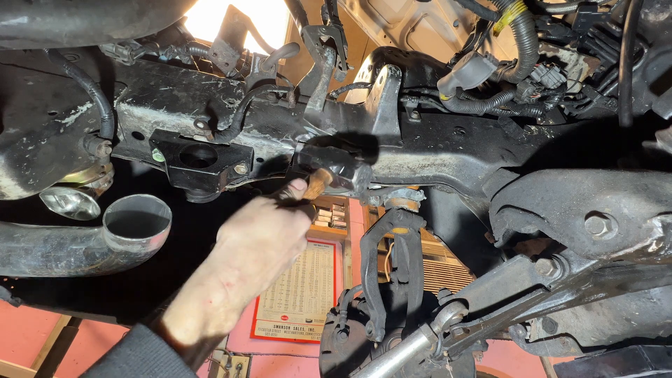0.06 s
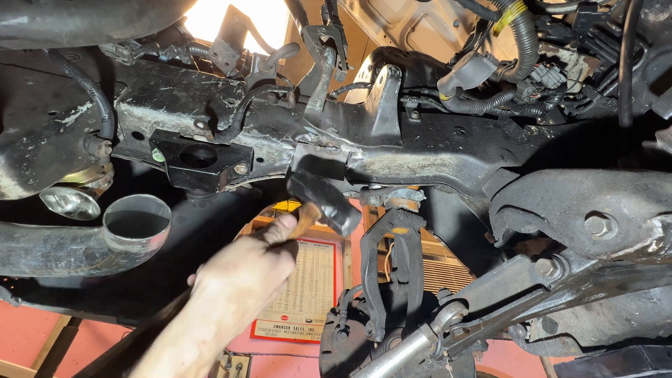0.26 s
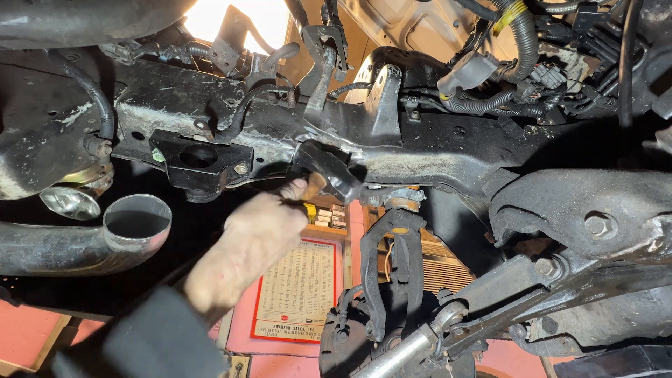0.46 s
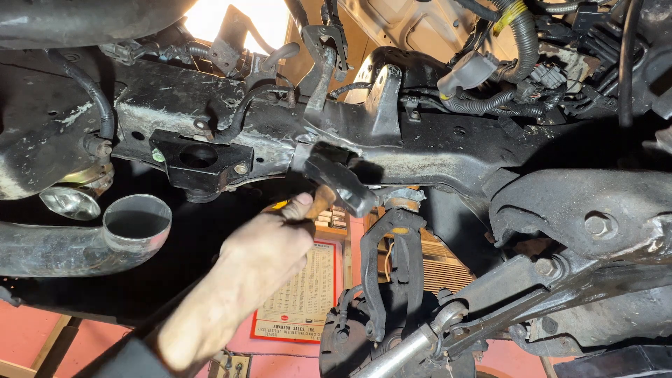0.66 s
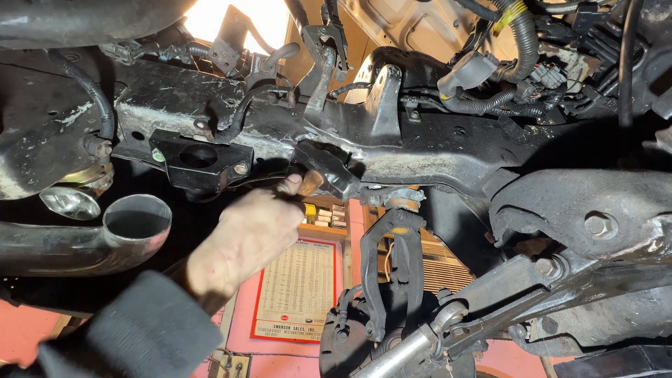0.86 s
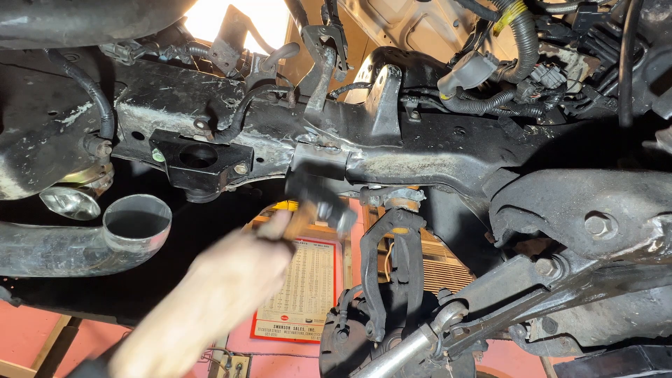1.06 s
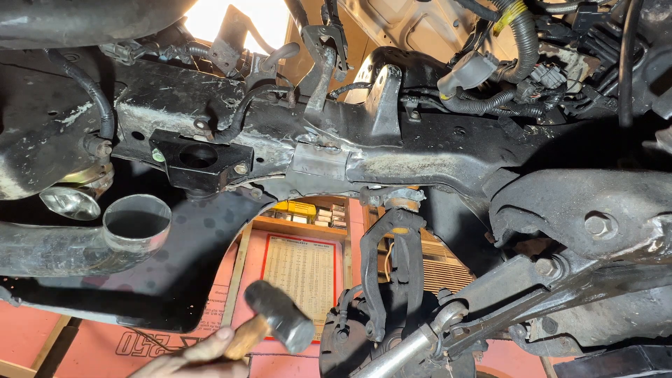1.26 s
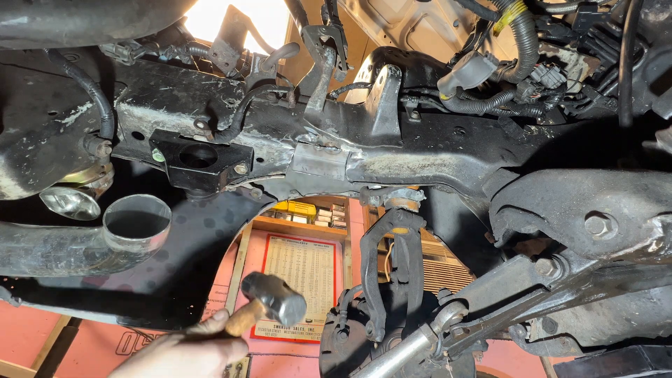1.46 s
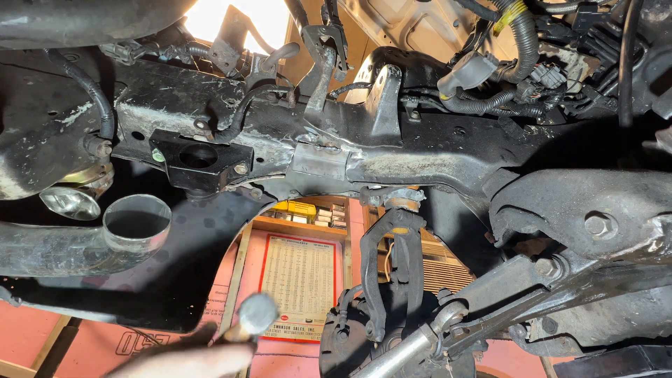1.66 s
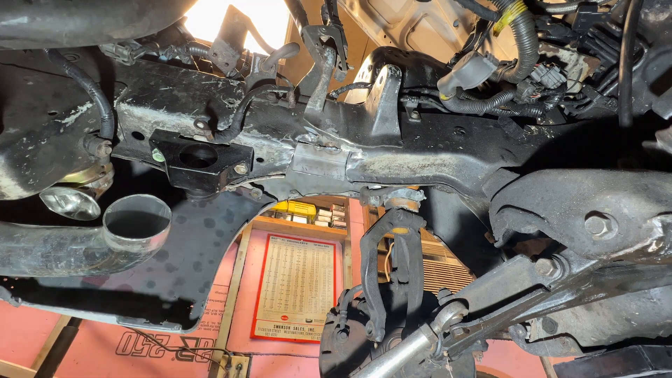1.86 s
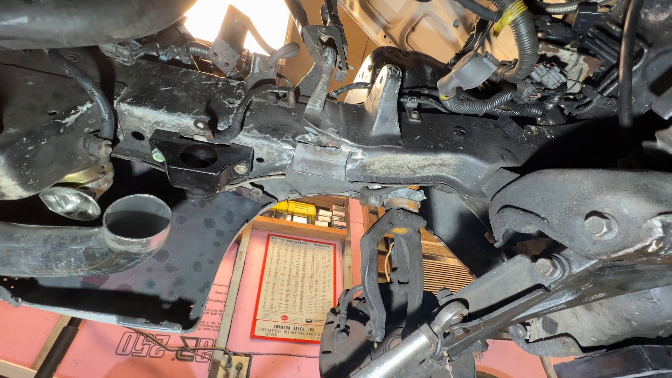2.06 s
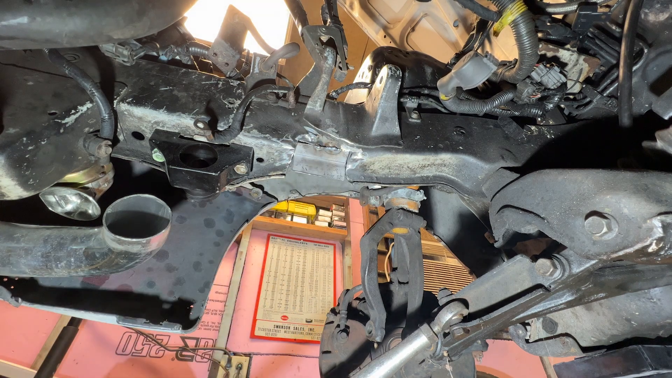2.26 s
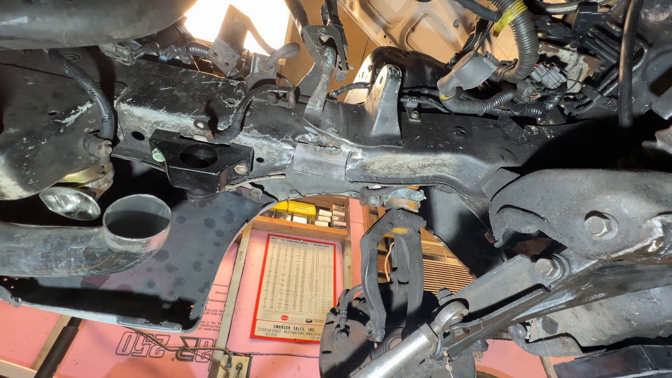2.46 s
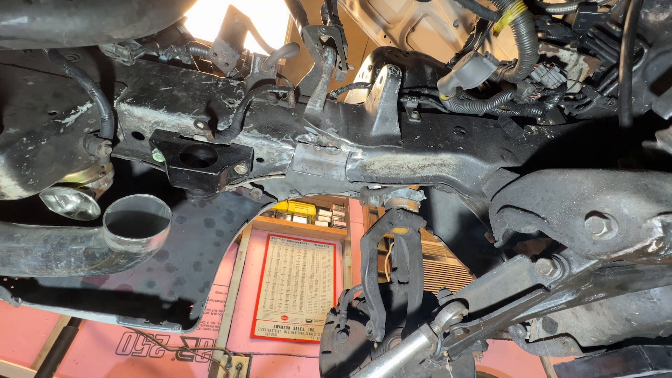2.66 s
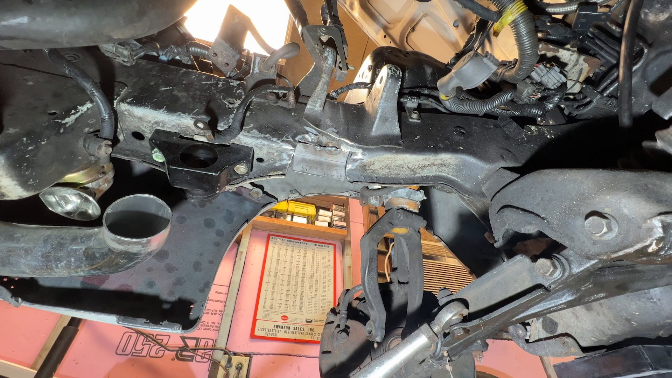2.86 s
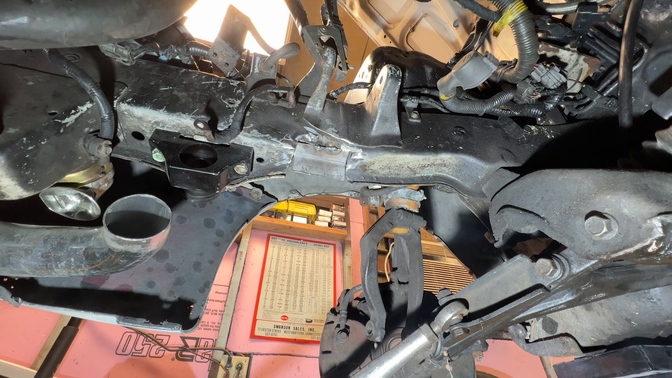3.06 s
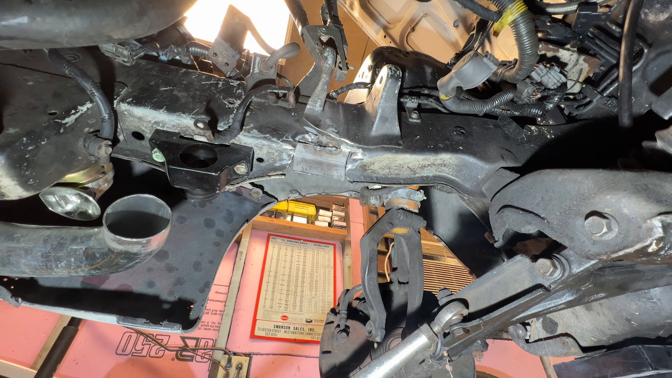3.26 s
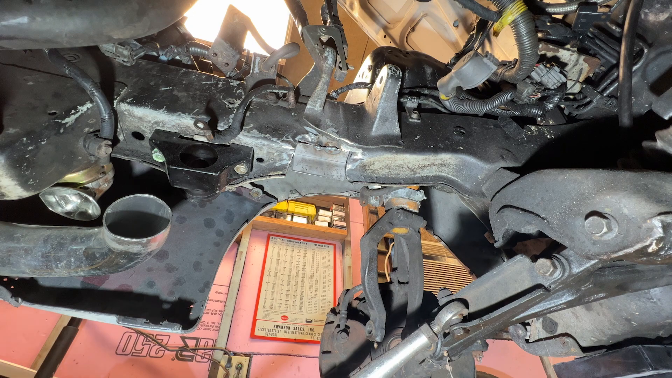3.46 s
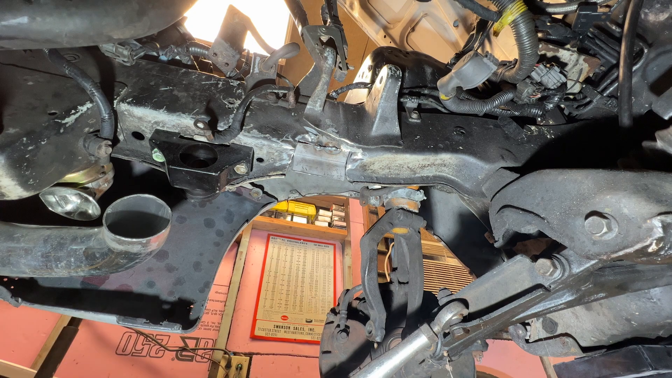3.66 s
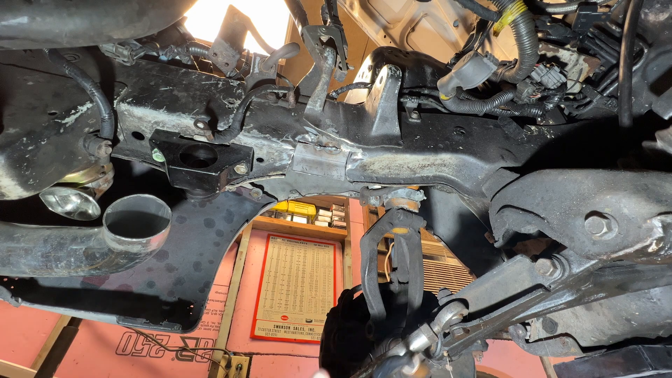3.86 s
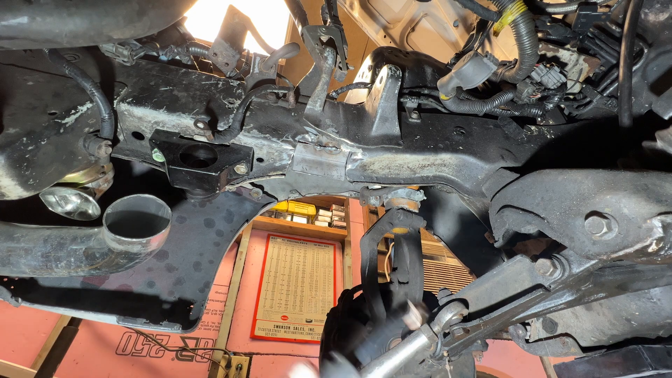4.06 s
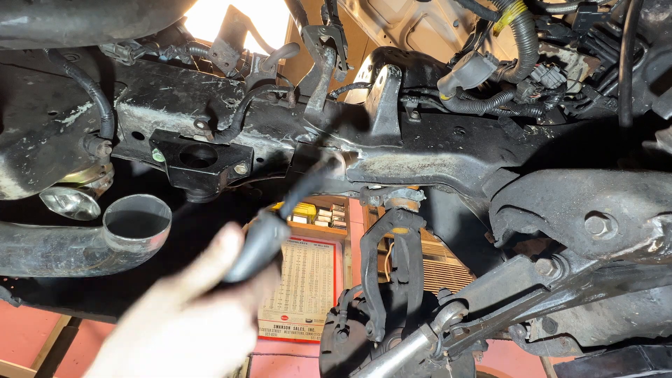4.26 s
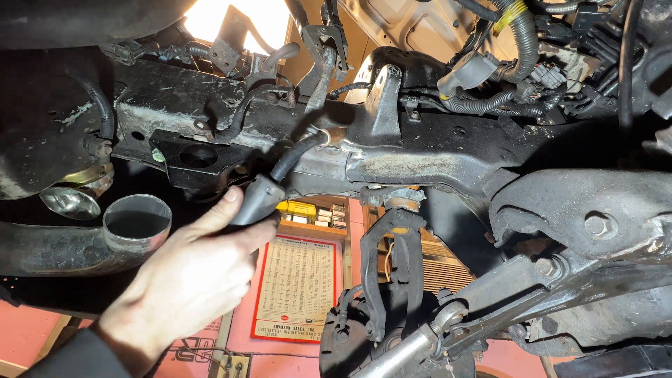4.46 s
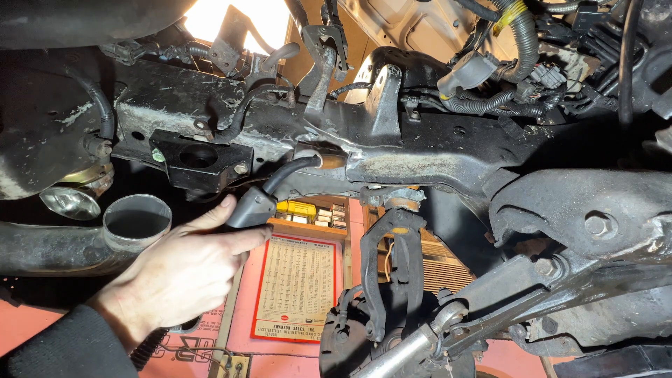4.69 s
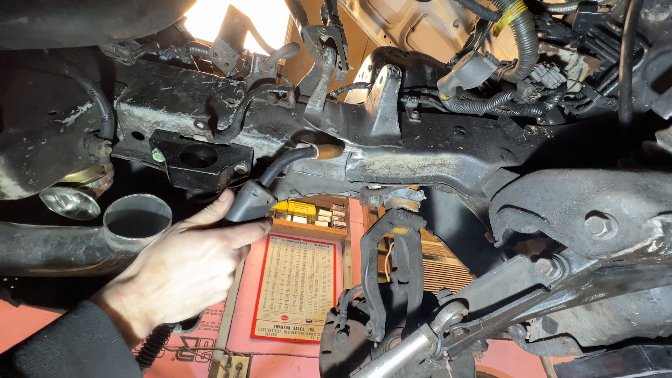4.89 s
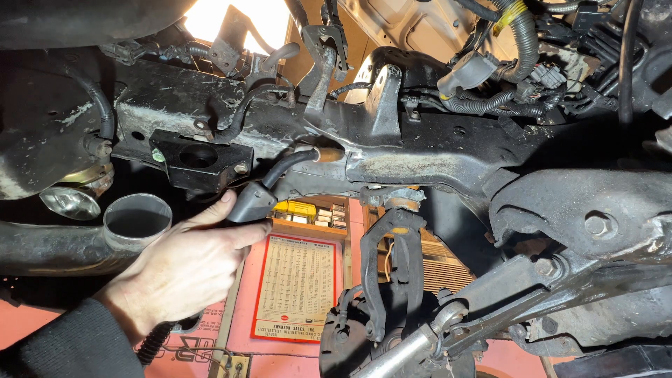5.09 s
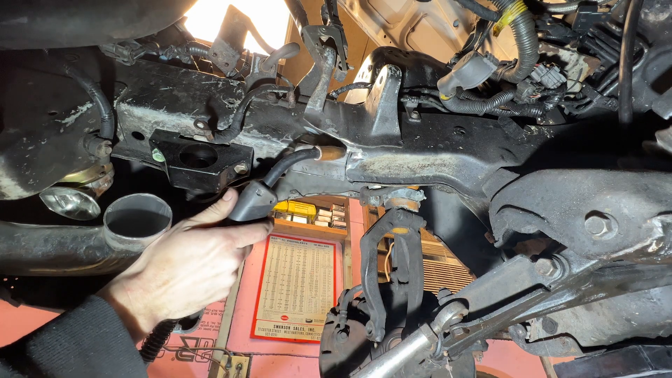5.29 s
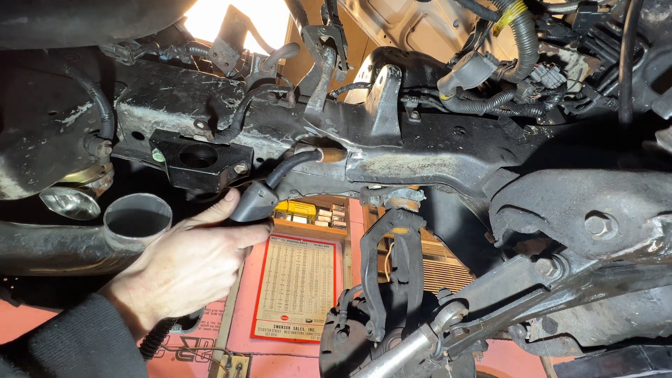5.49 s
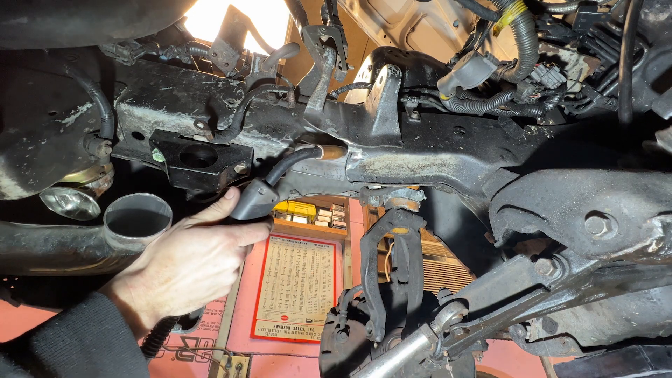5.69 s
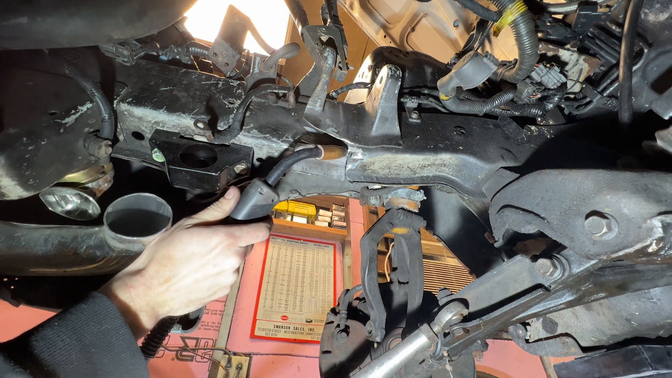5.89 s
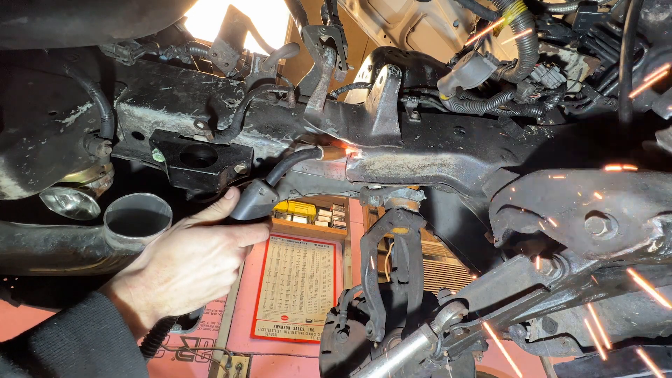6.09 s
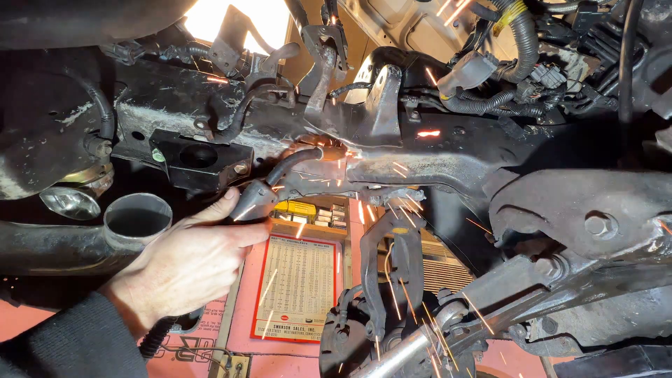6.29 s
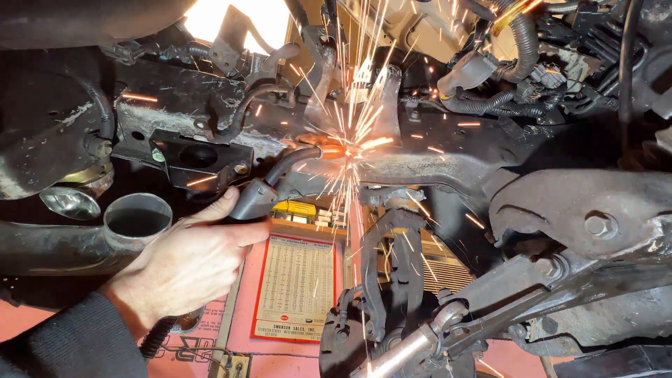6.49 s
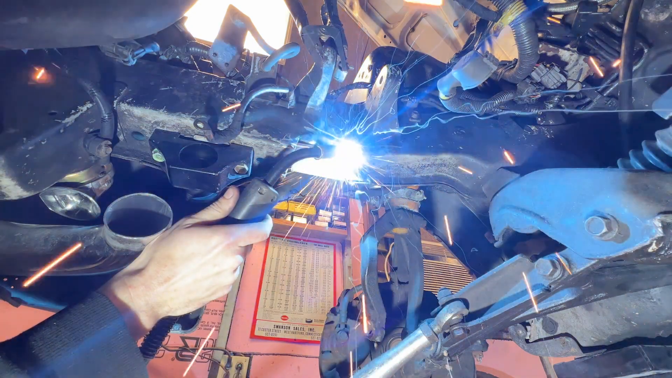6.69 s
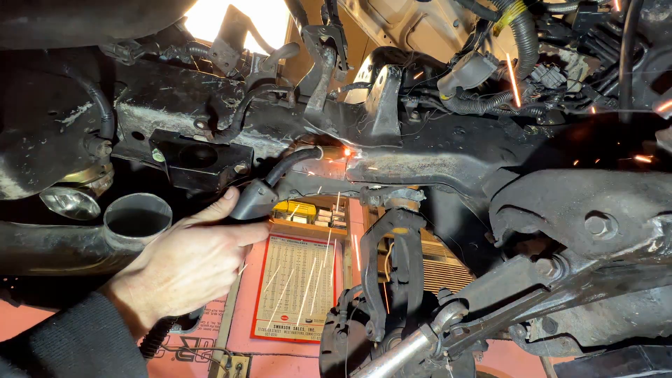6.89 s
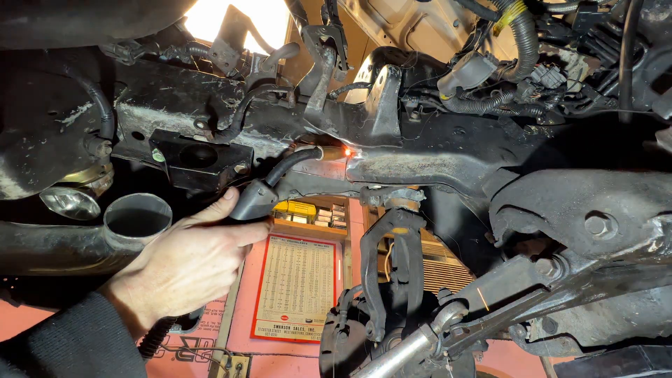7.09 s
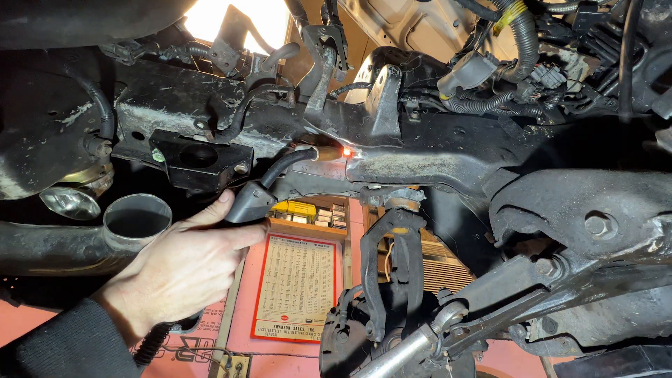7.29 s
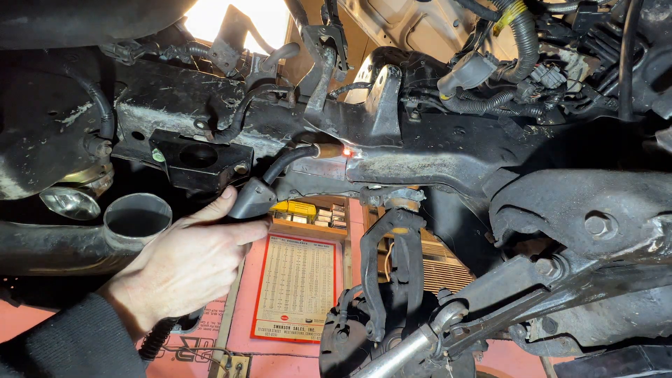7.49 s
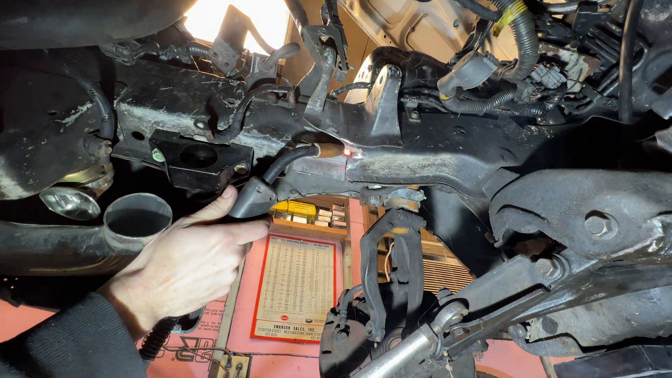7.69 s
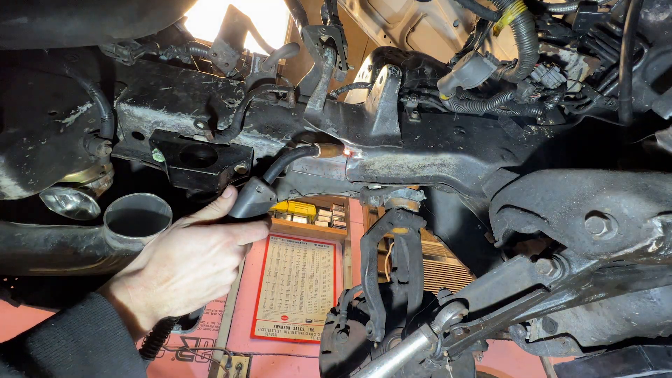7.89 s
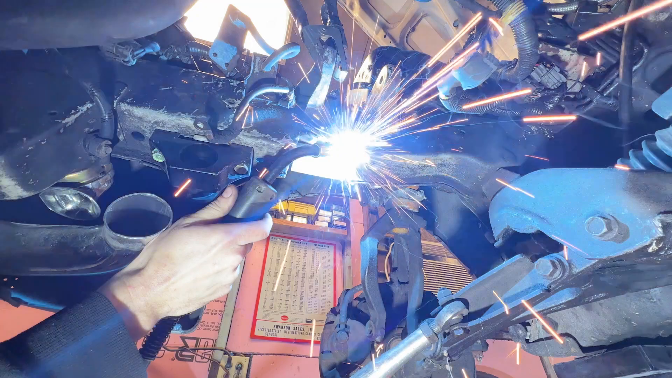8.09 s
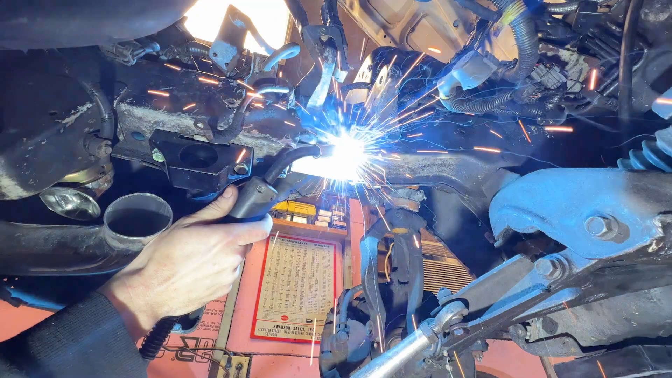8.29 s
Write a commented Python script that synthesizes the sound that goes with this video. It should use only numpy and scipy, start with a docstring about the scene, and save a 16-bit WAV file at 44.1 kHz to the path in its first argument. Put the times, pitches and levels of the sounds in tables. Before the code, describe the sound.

In a garage with a low, wavering machine hum, a hammer hits a car's steel frame twice, each rap a quick clatter with a short ring. Soft rustles and faint knocks follow, then a tool drops with a bright clink. The torch knocks into place, and a welder bursts out in uneven loud cracks and deep thumps, pauses, then sputters and sizzles again. Close stereo microphones.

```python
"""A wire-feed welder sputters in two bursts: each short circuit is a crack plus a decaying pressure push,
with grainy sizzle in the gaps. Before it a hammer raps a car's steel frame twice and a tool drops on metal:
noise contacts that excite ringing modes. Band noise makes small knocks and treble rustles; a machine hums
over broad garage noise. Two microphones colour the sound and the recorder lets the lows arrive late,
so every thump glides down."""
import sys
import numpy as np
from scipy import signal
from scipy.fft import rfft, irfft, next_fast_len
from scipy.io import wavfile
from scipy.ndimage import uniform_filter1d

SR = 44100
rng = np.random.default_rng(int(sys.argv[2]) if len(sys.argv) > 2 else 0)


def output_pcm(signal):
    """Save a mono or channel-first signal as 16-bit PCM at the path in sys.argv[1].

    Samples are clipped to [-1, 1] before scaling.
    """
    pcm = np.clip(np.atleast_2d(signal).T, -1, 1) * 32767
    wavfile.write(sys.argv[1], SR, np.round(pcm).astype(np.int16))


N = 367794
FFT_SIZE = next_fast_len(N + SR // 2)
FREQ_HZ = np.arange(FFT_SIZE // 2 + 1) * SR / FFT_SIZE + 1e-6  # offset avoids division by zero
TIME_S = np.arange(N) / SR

# Welds: each sputters, then burns steadily with small shorts. Each row: strike, steady and end times in
# seconds, sputter sizzle, steady sizzle, small crack and small thump levels in dB.
WELDS = [(5.99, 6.575, 6.86, -45, -32, -11, -11), (7.915, 8.095, 8.4, -42, -31, -7, -20)]


def undb(db):
    """Decibels to amplitude gain."""
    return 10 ** (np.asarray(db) / 20)


def on_log(table):
    """Interpolate (Hz, value) rows over log frequency."""
    hz, value = np.transpose(table)
    return np.interp(np.log(FREQ_HZ), np.log(hz), value)


def shape(x, response):
    """Filter by a frequency response."""
    return irfft(rfft(x, FFT_SIZE) * response, FFT_SIZE)[..., :N]


def low_cut(hz, order=2):
    """Response of cascaded first-order high-passes."""
    return 1 / (1 - 1j * hz / FREQ_HZ) ** order


def high_cut(hz, order=1):
    """Response of cascaded first-order low-passes."""
    return 1 / (1 + 1j * FREQ_HZ / hz) ** order


def band_pass(x, order, low_hz, high_hz):
    """Butterworth band-pass."""
    return signal.sosfilt(signal.butter(order, [low_hz, high_hz], "band", fs=SR, output="sos"), x)


def add(out, start_s, x):
    """Mix a sound in at start_s."""
    i = int(start_s * SR)
    out[..., i:i + x.shape[-1]] += x[..., :N - i]


def burst(decay_ms, cutoff_hz, shared, rise_ms):
    """Stereo noise burst of unit peak, low-passed; the channels share part of the noise."""
    noise = rng.standard_normal((3, 4096))
    t_ms = 1000 * TIME_S[:4096]
    envelope = np.exp(-t_ms / decay_ms) * (1 - np.exp(-t_ms / rise_ms))
    pair = (shared * noise[0] + (1 - shared) * noise[1:]) * envelope
    pole = np.exp(-2 * np.pi * cutoff_hz / SR)
    pair = signal.lfilter([1 - pole], [1, -pole], pair)
    return pair / np.abs(pair).max()


def ring(x, hz, t60_s):
    """One mode: each push starts a sine that decays 60 dB in t60_s."""
    pole = np.exp(2j * np.pi * hz / SR) * 1000 ** (-1 / (t60_s * SR))
    return signal.lfilter([0, pole.imag], [1, -2 * pole.real, abs(pole) ** 2], x)


def ring_all(x, modes):
    """Sum of modes given as rows of Hz, dB, t60 in seconds."""
    return sum(undb(db) * ring(x, hz, t60_s) for hz, db, t60_s in modes)


def fade(x, seconds):
    """Every push dies away exponentially with this time constant."""
    return signal.lfilter([1], [1, -np.exp(-1 / (seconds * SR))], x)


def room(dry, tail_db):
    """Garage reverberation: decaying noise in bands, independent per channel."""
    # Each row: band in Hz, t60 in seconds.
    room_decay = [(150, 0.64), (600, 0.41), (2000, 0.22), (6000, 0.23), (14000, 0.1)]
    t, tail = TIME_S[:SR // 2], 0
    for hz, t60_s in room_decay:
        noise = rng.standard_normal((2, len(t)))
        tail = tail + band_pass(noise, 2, hz / 2, min(1.494 * hz, .45 * SR)) * 1000 ** (-t / t60_s)
    tail = tail * np.clip((t - .003) / .0033, 0, 1)  # silent for 3 ms, then ramps in
    return dry + undb(tail_db) * shape(dry, rfft(tail, FFT_SIZE))


def garage():
    """Wavering machine hum and steady tones over coloured noise whose bass is alike in both channels."""
    # Background level over time: swells slowly, drops at 6.0 s, briefly climbs back, then stays low. Each row:
    # time in seconds, level in dB.
    air_level = [(0.0, -62), (1.36, -62.5), (2.3, -61), (3.1, -58), (3.8, -57), (5.2, -53.5), (5.96, -52.5),
                 (6.0, -64.5), (6.15, -56.5), (6.25, -72), (7.0, -70), (7.265, -69), (7.88, -67.5)]
    # Noise colour. Each row: frequency in Hz, relative spectral level in dB.
    noise_colour = [(25, -44), (52, -12.5), (120, -6), (165, -18.5), (204, -6.5), (270, -22.5),
                    (330, -20.5), (520, -24.5), (760, -24), (860, -30.5), (1350, -28), (2000, -38),
                    (7200, -47), (9500, -51.5), (11000, -88)]
    # Steady machine tones. Each row: frequency in Hz, amplitude in dB over the 300-3000 Hz noise rms.
    whines = [(120, -3), (321, -9.5), (657, -12), (765, -7), (888, -8), (1460, -14), (1104, -16.5)]
    hum_hz, hum_db, waver_hz, waver_db = 204.1, 19, 6, -7.5  # hum over the noise; waver width and share
    left_late_samples = 13
    turn = 2 * np.pi * TIME_S

    # complex narrow-band noise wavers the hum in level and phase
    waver = shape(rng.standard_normal((2, N)), 1 / (1 + (FREQ_HZ / waver_hz) ** 2))
    waver = 1 + undb(waver_db) * (waver[0] + 1j * waver[1]) / waver.std() / np.sqrt(2)
    hum_gain = np.sqrt(2) * undb(hum_db + np.array([[.4], [-.4]]))
    hum = hum_gain * (waver * np.exp(1j * (hum_hz * turn + np.array([[0], [.36]])))).imag

    colour = undb(on_log(noise_colour))
    mid, side = rng.standard_normal((2, N))
    mid = shape(mid, colour)
    side = shape(side, colour / np.sqrt(1 + (320 / FREQ_HZ) ** 4))
    noise_rms = np.sqrt(np.mean(shape(mid, (FREQ_HZ > 300) & (FREQ_HZ < 3000)) ** 2))
    noise = np.array([np.roll(mid + side, left_late_samples), mid - side]) / noise_rms

    late_turn = turn - 2 * np.pi * np.array([[left_late_samples / SR], [0]])
    whine = sum(undb(db) * np.sin(hz * late_turn + rng.uniform(0, 2 * np.pi)) for hz, db in whines)
    time_s, level_db = np.transpose(air_level)
    return undb(np.interp(TIME_S, time_s, level_db)) * (hum + whine + noise)


def rustles():
    """Soft Gaussian swells of band-passed treble noise."""
    # Each row: centre time in seconds, level in dB, upper band edge in Hz, two sigmas in seconds.
    rustle_rows = [(1.622, -62.5, 7000, 0.12), (2.017, -59, 6000, 0.24), (2.323, -60, 6140, 0.06),
                   (2.65, -59.5, 6200, 0.24), (2.976, -60, 7140, 0.088), (3.61, -56.5, 6900, 0.046),
                   (4.292, -52, 7900, 0.038), (4.367, -48.5, 7260, 0.056), (5.42, -65, 10000, 0.069),
                   (5.722, -61, 8900, 0.055), (7.103, -58.5, 5570, 0.23), (7.597, -60, 5630, 0.9)]
    out = np.zeros((2, N))
    for centre_s, db, hz, length_s in rustle_rows:
        swell = np.exp(-.5 * ((TIME_S - centre_s) / (length_s / 2)) ** 2)
        out += undb(db) * swell * band_pass(rng.standard_normal((2, N)), 1, .61 * hz, hz)
    return out


def ticks():
    """Small knocks of torch and cable: noise bursts, each in its own band."""
    # Each row: start in seconds, dry peak in dB, band centre in Hz, width in octaves, decay constant in ms.
    knocks = [(2.284, -54, 6500, 0.7, 3.2), (2.439, -42, 900, 0.75, 6.5), (2.582, -45, 1880, 0.32, 14),
              (2.584, -50, 3370, .5, 3.8), (2.583, -35, 750, 1.2, 8.2), (3.286, -50.5, 1520, 2.4, 5),
              (4.101, -42.5, 3040, 1.9, 3.8), (4.245, -25.5, 3080, 2.35, 5.7), (4.248, -33, 756, 0.7, 8.5),
              (4.539, -47, 7500, 0.41, 3), (4.576, -44, 8000, 0.3, 3.6), (4.577, -37, 1294, 2.2, 9),
              (4.595, -46, 3500, 2.4, 4.3), (4.707, -46, 8470, 0.34, 4), (4.735, -57, 8600, 0.49, 4),
              (5.228, -52, 7400, 0.1, 19), (5.229, -46, 12300, 0.51, 17), (5.973, -19, 1930, 0.76, 7.9),
              (6.96, -34.5, 218, 2.05, 4.1)]
    out = np.zeros((2, N))
    for start_s, db, hz, octaves, ms in knocks:
        half = 2 ** (octaves / 2)
        tick = band_pass(burst(ms, 16000, .34, .45), 2, hz / half, min(hz * half, .45 * SR))
        add(out, start_s, undb(db) * tick / np.abs(tick).max())
    return room(out, -35)


def struck(events, modes, ring_db, room_db, thin_hz):
    """Each contact rattles briefly and excites the modes; little bass reaches the air directly."""
    contact = np.zeros((2, N))
    for start_s, db, cutoff_hz, ms in events:
        add(contact, start_s, undb(db) * burst(ms, cutoff_hz, .32, 2.0))
    rings = undb(ring_db) * shape(ring_all(contact, modes), low_cut(60))
    return room(shape(contact, low_cut(thin_hz)) + rings, room_db)


def dropped_tool():
    """A tool bounces on metal: contact noise rings the tool's modes."""
    # Each row: start in seconds, contact level in dB, hardness (low-pass) in Hz, rattle decay in ms.
    clinks = [(3.871, -4.5, 8900, 3.9), (3.882, -16, 2980, 14.5), (3.897, -20, 3960, 4.7),
              (3.915, -26.5, 2960, 32), (3.937, -29, 2500, 9.1)]
    # Each row: mode in Hz, relative level in dB, t60 in seconds.
    tool_modes = [(272.5, -13.5, 0.22), (343, 4, 0.037), (512, -26, 0.05), (676, -7.5, 0.16),
                  (936, -15, 0.35), (1260, -10, 0.032), (2200, -10, 0.039), (2760, -24, 0.048),
                  (3145, -0.5, 0.07), (4580, -11, 0.16), (5470, -7, 0.051), (6220, 3, .13),
                  (12100, -7.5, 0.087)]
    return struck(clinks, tool_modes, -32, -39, 300)


def hammer():
    """Two raps of several contacts each: contact noise rings the steel frame's modes."""
    # Each row: start in seconds, contact level in dB, hardness (low-pass) in Hz, rattle decay in ms.
    blows = [(.445, -8.5, 4780, 19), (.460, -2.5, 3260, 11), (.478, -6, 1180, 5), (.514, -11, 3600, 8.7),
             (.528, -15, 3004, 14), (.832, -6.5, 5200, 20), (.848, -2.5, 3500, 3.9),
             (.861, -8.5, 1210, 8.8), (.955, -39, 2480, 16)]
    # Each row: mode in Hz, relative level in dB, t60 in seconds.
    frame_modes = [(114.3, -14, .6), (195, -13, 0.54), (640, -29, 0.042), (698, -9.5, 0.11),
                   (776, -11, 0.11), (1084, -18, 0.41), (1260, -15.5, 0.17), (1900, -11, 0.032),
                   (2088, -9, 0.037), (2410, -9.5, 0.02), (2770, -8.5, 0.023), (3203, -20, 0.14),
                   (5060, -10, 0.046), (5380, -11, .06), (474, -25, .8), (484.5, -21, .8), (523, -32, .6),
                   (650, -30, .5), (6078, -30, .5), (300, -10.5, 0.11)]
    return struck(blows, frame_modes, -31, -37, 230)


def shorts():
    """All short circuits: the clear ones, and an uneven patter wherever the steady arc leaves room."""
    # Clear shorts. Each row: time in seconds, crack level in dB, left thump level in dB.
    pops = [(5.9796, 0, -1.5), (6.1303, -1.5, 3), (6.1673, -6, 9), (6.1753, -12, -0.5), (6.1813, -14.5, -1),
            (6.191, -4.5, 0.5), (6.2206, 2.5, 2), (6.327, 3.5, 5), (6.373, -3, 4.5), (6.3843, -11.5, 4.5),
            (6.416, 6, 0.5), (6.4973, 2.5, 4), (6.5404, -4, 3), (6.5642, 0, 5.5), (6.574, -6, 4.5),
            (6.5841, -5.5, 0.5), (6.605, -12, -2.5), (6.6149, -5.5, -9), (6.6349, -4.5, 5),
            (6.652, -20, 2.5), (6.668, -8.5, 4.5), (6.6851, -4, 1.5), (6.6957, -6.5, -4.5),
            (6.7032, -9, -4.5), (6.7119, -7, 2), (6.725, -12.5, -10.5), (6.737, -8.5, -11),
            (6.7466, -7, -0.5), (6.7625, -8.5, -1.5), (6.7864, -8, -11), (6.7951, -11.5, 0),
            (6.8034, -4, -12.5), (6.818, 0.5, -13), (6.8275, -14.5, -4.5), (6.8423, -13.5, -5),
            (6.8559, -0.5, -11.5), (7.914, 2, -9.5), (7.9569, 3, -7.5), (8.0016, 0.5, -1.5),
            (8.0318, 2.5, -7), (8.0631, -3.5, -2), (8.0946, 1.5, -5.5), (8.1686, -2.5, -34),
            (8.181, 1, -7.5), (8.2149, -0.5, 0.5), (8.225, -3.5, -1.5), (8.2358, 0.5, -3),
            (8.2998, -5, -2.5), (8.3265, -5, -10.5), (8.3361, -13, 1)]
    rate_hz, jitter, spread_db = 112, .12, 2.5
    recover_s, strong_db = .016, 0  # the arc recovers for this long after a thump above strong_db
    rows = list(pops)
    recovering = [s + recover_s / 2 for s, _, db in pops if db > strong_db]
    taken = np.r_[np.array(pops)[:, 0], recovering]
    for _, steady_s, end_s, _, _, crack_db, thump_db in WELDS:
        chance = rng.standard_normal((48, 3))
        times = steady_s + np.cumsum(1 + jitter * chance[:, 0]) / rate_hz
        for s, (_, a, b) in zip(times, chance):
            if s < min(end_s, TIME_S[-1]) and np.abs(taken - s).min() > .5 / rate_hz:
                rows.append((s, crack_db + spread_db * a, thump_db + 2 * spread_db * b))
    return sorted(rows)


def sizzle():
    """Gain of arc and spatter hiss: faint while sputtering, full while steady, fading after."""
    # the wire fizzes ever louder as it first meets the steel
    touch_s, length_s, touch_db, rise_db = 5.951, .031, -29.5, 13
    fade_s = .013
    touching = (TIME_S > touch_s) & (TIME_S < touch_s + length_s)
    touch = undb(touch_db + rise_db * np.clip((TIME_S - touch_s) / length_s, 0, 1)) * touching
    out = uniform_filter1d(touch, size=256)
    for strike_s, steady_s, end_s, sputter_db, steady_db, _, _ in WELDS:
        gain = np.where(TIME_S < steady_s, undb(sputter_db), undb(steady_db)) * (TIME_S > strike_s)
        out += uniform_filter1d(gain, size=512) * np.exp(-np.maximum(TIME_S - end_s, 0) / fade_s)
    return out


def rumble(thumps):
    """Each thump rings a low note and stirs up deep noise, in each channel by its own strength."""
    rumble_db, power_fade_s = -22, .045
    boom_hz, boom_db, boom_t60_s = 61, -15.5, .25
    noise = rng.standard_normal((3, N))
    deep = shape(noise[0] + .22 * noise[1:], low_cut(50, 3) * high_cut(75, 4))
    stir = np.sqrt(np.abs(uniform_filter1d(fade(thumps ** 2, power_fade_s), size=512)))
    boom = shape(ring(thumps, boom_hz, boom_t60_s), low_cut(35))
    return undb(rumble_db) * stir * deep / deep.std() + undb(boom_db) * boom


def welder():
    """Each short is a crack in the air and a push or pull of pressure; sizzle fills the gaps."""
    # Arc colour. Each row: frequency in Hz, gain in dB.
    arc_colour = [(200, -17), (600, -14), (1200, -3.5), (1900, -7.5), (2500, -7.5), (3400, -7), (4000, 0.5),
                  (4800, -3), (6000, 1.5), (7400, 0), (9000, 0.5), (10400, 0), (11700, 5.5), (13700, 5)]
    # Steel around the arc. Each row: mode in Hz, relative level in dB, t60 in seconds.
    bay_modes = [(1180, -13, 0.023), (3200, -19.5, 0.0076), (4070, -13.5, 0.0033), (5970, -19.5, 0.042),
                 (9160, -4, 0.011), (11680, 2, 0.00093)]
    rest_s = .055  # a thump's deep part is full only after a pause this long
    cracks, pushes, deep = np.zeros((3, 2, N))
    last_s = 0
    for s, crack_db, thump_db in shorts():
        # a one-sample snap plus a rough few milliseconds, stronger on the left
        rough = undb([[-2], [-5]]) * burst(3.1, 12700, .51, .4)
        add(cracks, s, undb(crack_db) * rough)
        add(cracks, s, undb(crack_db + 8) * np.ones((2, 1)))
        # the first weld leans further left than the second
        lean_db = (6.5 if s < 7 else 3.2) + 1.5 * rng.standard_normal()
        thump = rng.choice([-1, 1]) * undb([[thump_db], [thump_db - lean_db]])
        add(pushes, s, thump)
        add(deep, s, thump * min((s - last_s) / rest_s, 1))
        last_s = s

    # droplets make the sizzle grainy: a new random gain every 32 samples
    droplets = np.repeat(rng.exponential(size=N // 32 + 1), 32)[:N]
    grain = undb(2.2 * (droplets - 1))
    noise = rng.standard_normal((3, N))
    cracks += grain * sizzle() * shape(noise[0] + 1.5 * noise[1:], high_cut(9000, 2))
    cracks += undb(-24.5) * ring_all(cracks, bay_modes)
    # the arc is nearer the right microphone: the left lags by 15 samples
    lag = np.exp(-2j * np.pi * FREQ_HZ * np.array([[15 / SR], [0]]))
    air = room(shape(cracks, lag * undb(on_log(arc_colour))), -36.5)

    # the pressure leaks away more slowly on the left; the right follows a little late
    leak_s, bass_hz = np.array([[.0016], [.0007]]), np.array([[38], [60]])
    late = np.exp(-2j * np.pi * np.array([[0], [1]]) * (FREQ_HZ * .00061 + .17))
    leak = leak_s * SR / (1 + 2j * np.pi * FREQ_HZ * leak_s)
    pressure = shape(pushes, late * leak * high_cut(1800) * low_cut(bass_hz))
    return air + rumble(deep) + pressure


def scene():
    """Sum of all sources."""
    return garage() + rustles() + ticks() + dropped_tool() + hammer() + welder()


def record(dry):
    """Microphone colour, late lows, tanh soft ceiling and a steep treble cut-off."""
    # Each row: frequency in Hz, gain in dB.
    mic_left = [(60, -1), (700, 1), (2400, 4), (4400, 1), (6000, 2.5), (7500, 0), (12000, -4), (14000, -13),
                (16000, -6.5)]
    mic_right = [(60, -2.5), (700, 3), (2400, 2), (4400, -5), (6000, -7.5), (8500, -1), (12000, -1.5),
                 (14000, -11.5), (16000, -1)]
    late_periods, taper_hz, plain_delay_s, top_hz = 1.3, 1000, .0011, 15900
    colour = undb(np.array([on_log(mic_left), on_log(mic_right)]))
    # all-pass: lows are late by about late_periods of their own period, tapering off towards taper_hz
    low_turns = late_periods * np.log((1 + FREQ_HZ / 20) / (1 + FREQ_HZ / taper_hz))
    late_lows = np.exp(-2j * np.pi * (plain_delay_s * FREQ_HZ + low_turns))
    wet = np.tanh(shape(dry, colour * late_lows))
    return signal.sosfilt(signal.ellip(10, .2, 80, top_hz, fs=SR, output="sos"), wet)


dry = scene()
out = record(dry)
output_pcm(out)
```